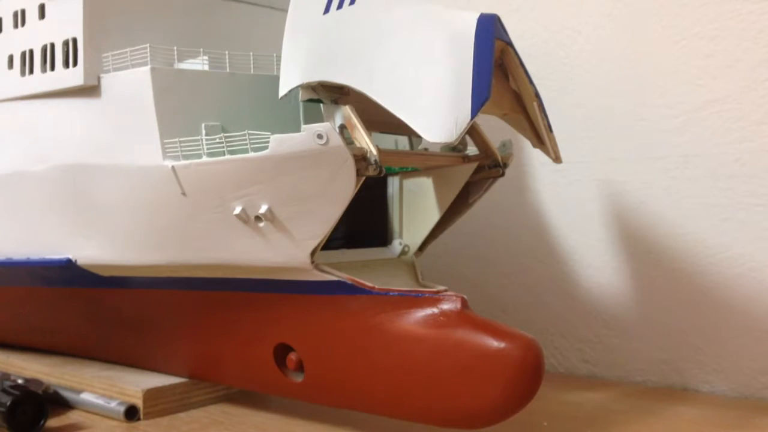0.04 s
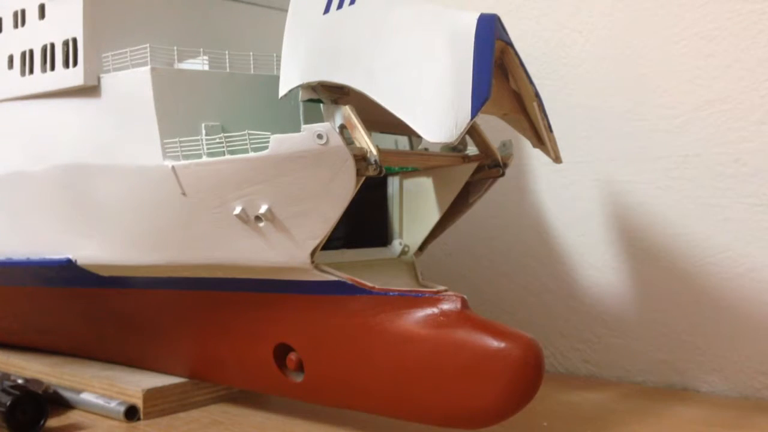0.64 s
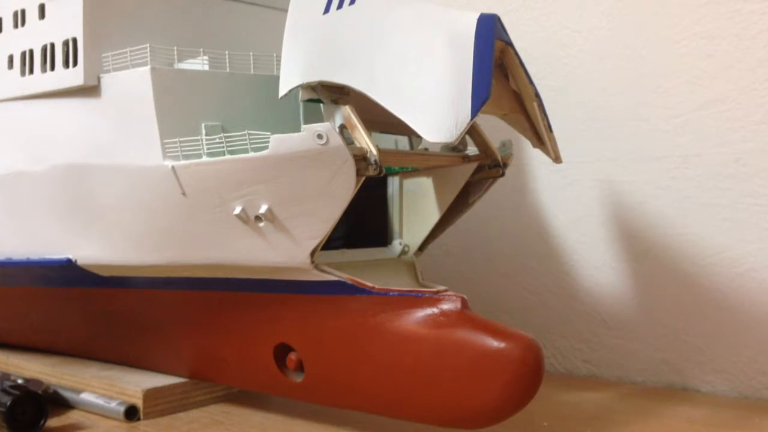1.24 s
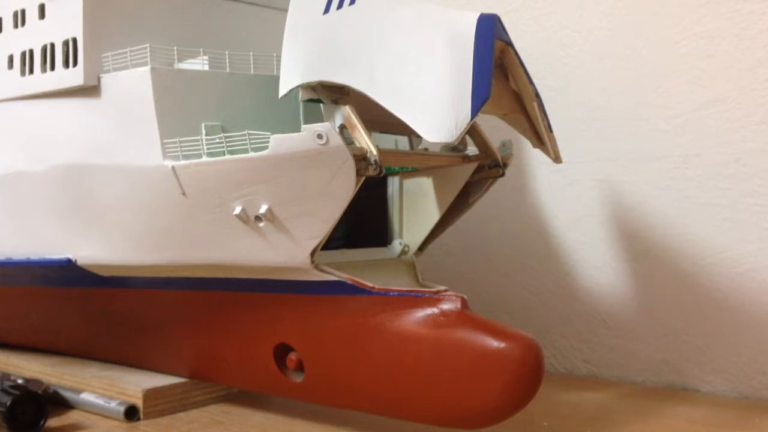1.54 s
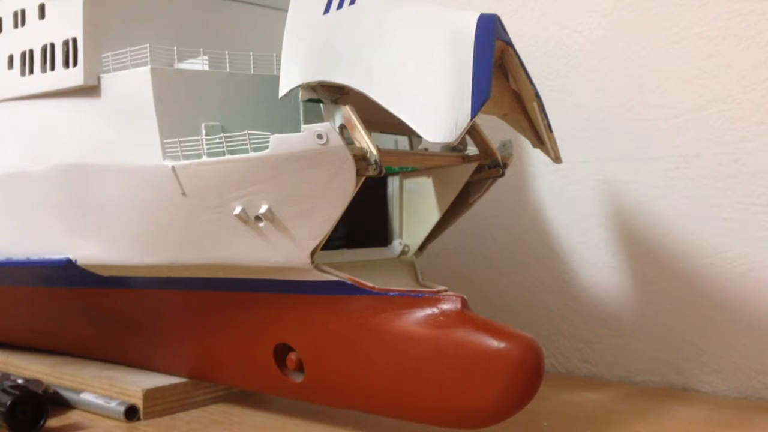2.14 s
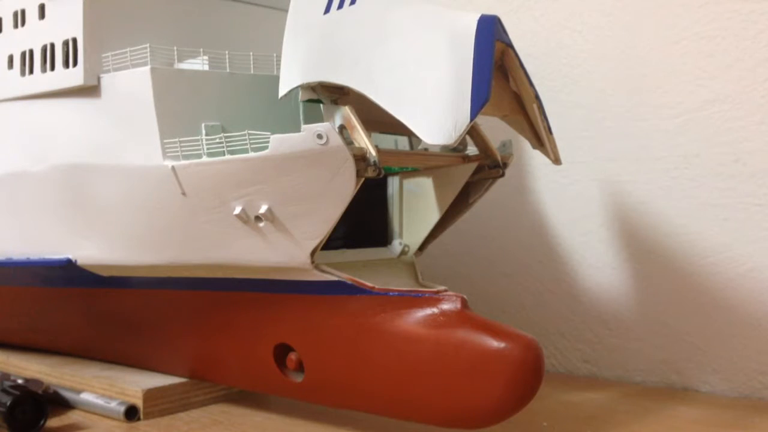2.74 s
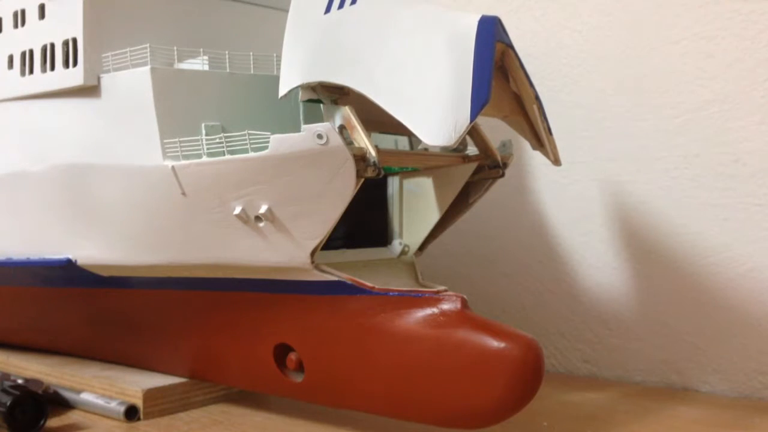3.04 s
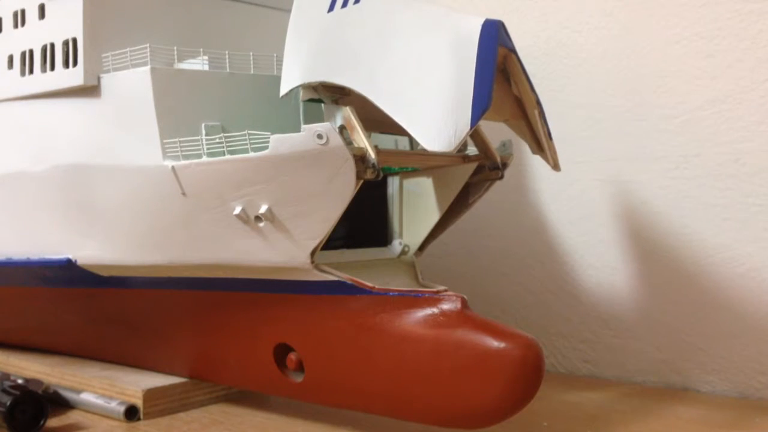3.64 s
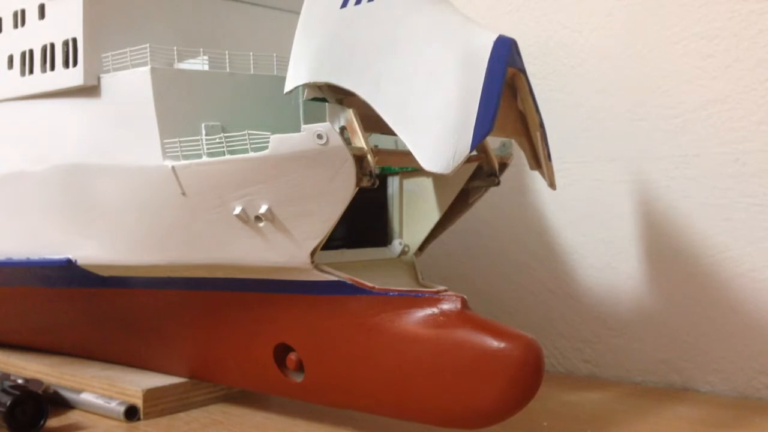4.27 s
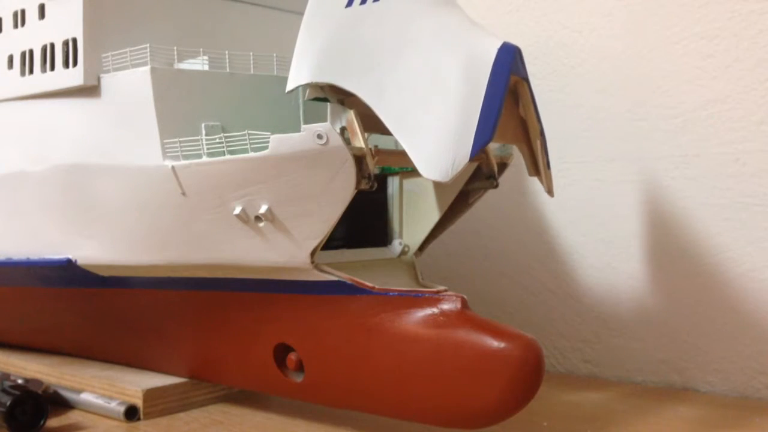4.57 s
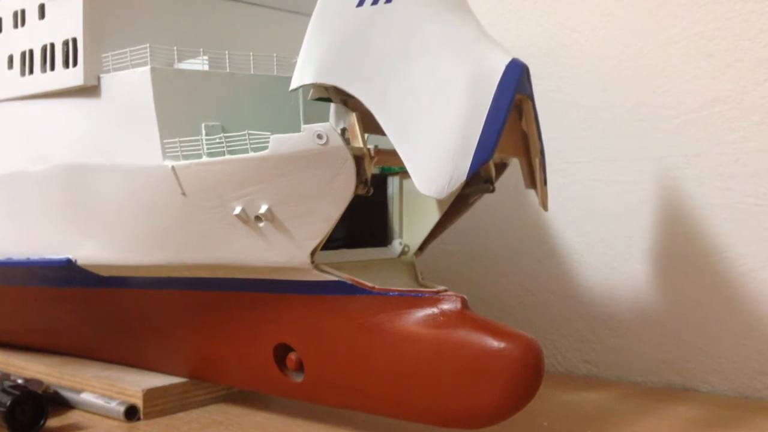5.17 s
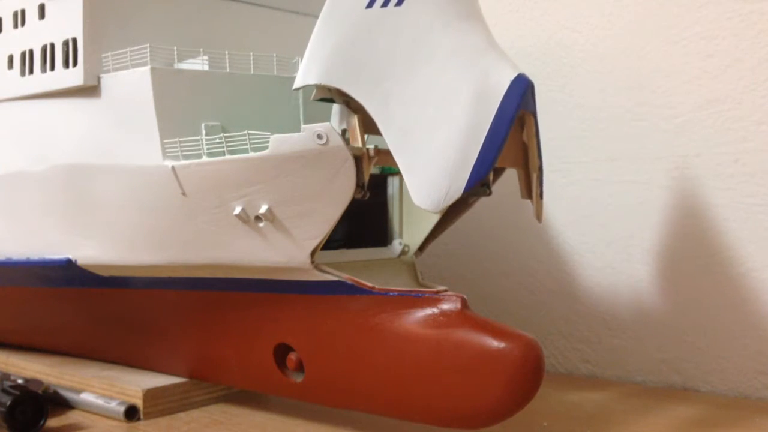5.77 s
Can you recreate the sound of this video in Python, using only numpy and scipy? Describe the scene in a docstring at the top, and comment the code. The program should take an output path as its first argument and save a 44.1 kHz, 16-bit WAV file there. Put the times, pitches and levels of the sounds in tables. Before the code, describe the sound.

For almost two seconds there is only the soft air of a quiet room, with a few faint, dull ticks in the first second. At about 1.9 seconds a small geared electric motor starts with a short clatter and spins up almost at once. It runs with a mid-pitched hum, a higher gear whine, a fast rattling chatter and a thin hiss. Between 2.4 and 3.4 seconds the linkage rubs and scrapes faintly. From about 3.2 seconds, as the motor lowers a model ship's bow visor, the hum becomes clearly stronger, a gear tone throbs, and the pitch sags slightly before partly recovering. The gears ring in short bouts, most strongly just after 4 seconds, and tiny squeals come and go, with one brief brighter squeak near 5.5 seconds. The hum stutters slightly under load, and the motor is still running at the end, near 5.8 seconds.

```python
"""A small geared DC motor lowers the hinged bow visor of a model ship, in a quiet room.
A few faint ticks sound over the still air. Near 1.9 s the current comes on: the gears jolt and
rattle as the motor spins up. Its three-pole rotor hums through the hull, the gears whine and
knock once a turn, and the brush hiss builds. From about 3 s the visor moves and a lower gear tone
throbs. The linkage rubs now and then, and the motor slows a little whenever the linkage loads it."""
import sys
import numpy as np
from scipy.fft import rfft, irfft, next_fast_len
from scipy.io import wavfile
from scipy.ndimage import map_coordinates

SR = 44100
rng = np.random.default_rng(int(sys.argv[2]) if len(sys.argv) > 2 else 0)


def digitize_waveform(pressure):
    """Quantize a signal to 16-bit integers and store it at the path in sys.argv[1].

    Rows of a 2-D input are taken as channels; values are limited to [-1, 1].
    """
    field = np.atleast_2d(pressure).T
    bounded = np.clip(field, -1, 1)
    quanta = np.round(bounded * 32767).astype(np.int16)
    wavfile.write(sys.argv[1], SR, quanta)


N = 256220
TIME = np.arange(N) / SR
SWITCH_ON_S, SPIN_UP_S = 1.877, 0.205  # the current is fully on; time to reach running speed


def amp(db):
    """Decibels to gain."""
    return 10 ** (np.asarray(db) / 20)


def unit(x):
    """Scale to rms 1."""
    return x / np.sqrt(np.mean(x ** 2) + 1e-20)


def along(points, hz):
    """Read (Hz, value) points on a log frequency axis."""
    freqs, values = np.transpose(points)
    return np.interp(np.log(hz + 1), np.log(freqs), values)


def curve(points):
    """An automation line through (seconds, value) points."""
    return np.interp(TIME, *np.transpose(points))


def wobble(rate):
    """A smooth random curve with rate knots a second."""
    coarse = np.arange(0, N + 64, 64)
    knots = rng.standard_normal(1024)
    return np.interp(np.arange(N), coarse, map_coordinates(knots, [coarse * rate / SR], mode="wrap"))


def held(start, end, attack, release):
    """An envelope that reaches 1 at start, holds until end, then falls; all in seconds."""
    return np.interp(TIME, [start - attack, start, end, end + release], [0, 1, 1, 0])


def spells(rows, attack, release):
    """The summed gain of held (start, end, dB) events."""
    return sum(amp(db) * held(start, end, attack, release) for start, end, db, *_ in rows)


def since_start(seconds):
    """Rises from 0 at switch-on to 1 after so many seconds."""
    return np.clip((TIME - SWITCH_ON_S) / seconds, 0, 1)


def settling(seconds):
    """Falls from 1 at switch-on to 0 after so many seconds, slowly at first."""
    return 1 - since_start(seconds) ** 2


def filtered(x, response):
    """Shape x by a gain that depends on frequency."""
    size = next_fast_len(N + SR // 4)
    return irfft(rfft(x, size) * response(np.fft.rfftfreq(size, 1 / SR)), size)[:N]


def peak(hz, centre, width):
    """A resonance curve: 1 at the centre, one half at half a width to either side."""
    return 1 / (1 + (2 * (hz - centre) / width) ** 2)


def noise(spectrum, gate=1):
    """Gated noise of rms 1, coloured by (Hz, dB) points."""
    return unit(filtered(gate * rng.standard_normal(N), lambda hz: amp(along(spectrum, hz))))


def tone(phase):
    """A sine of rms 1."""
    return np.sqrt(2) * np.sin(phase)


def once_a_turn(angle, sharp):
    """A swell at the same shaft angle on every turn."""
    return np.exp(sharp * (np.cos(angle) - 1))


def room_air():
    """The still air of the room: a soft, broad bed of noise."""
    # The colour of the air. Each row: frequency in Hz, relative level in dB.
    colour = [(15, -36), (25, -12), (60, -2), (125, -1), (146, -12), (180, -2.5), (415, -3), (450, -4),
              (488, -2.5), (927, -6.5), (1420, -8), (2850, -7), (10900, -8.5), (15000, -9.5)]
    return amp(-68 + 0.4 * wobble(12)) * noise(colour)


def ticks(t60_s=0.21):
    """Soft, dull ticks that die away quickly in the room."""
    # Ticks before the motor runs. Each row: start in seconds, level in dB.
    hits = [(.047, -70.5), (.171, -67.5), (.304, -69), (.379, -70), (0.774, -68)]
    level = sum(amp(db - 60 * np.abs(TIME - start) / t60_s) * (TIME > start) for start, db in hits)
    return level * noise([(150, -23), (450, 1.5), (1600, -0.5), (2400, -4.5), (3500, -22)])


def linkage(idle_db=-84):
    """The arms rumble against the hull and scrape now and then as they push the visor."""
    # Low rubs on the hull. Each row: start and end in seconds, level in dB.
    rubs = [(2.37, 2.41, -68), (2.77, 2.83, -66), (2.87, 2.92, -64), (4.21, 4.24, -72), (5.54, 5.57, -74)]
    # Bright scrapes. Each row: start and end in seconds, centre and width in Hz, level in dB.
    scrapes = [(2.46, 2.56, 2580, 450, -62.5), (2.61, 2.68, 2330, 400, -61), (2.42, 3.36, 7700, 1700, -69),
               (3.8, 3.3, 3836, 364, -67)]
    level = amp(idle_db) + spells(rubs, attack=0.027, release=0.027)
    total = level * noise([(40, -36), (90, -16), (135, -7), (200, -19), (320, -10), (600, -58)])
    for start, end, centre, width, db in scrapes:
        stroke = held(start, end, attack=0.02, release=0.0084)
        rasp = filtered(rng.standard_normal(N), lambda hz: peak(hz, centre, width))
        total += amp(db) * stroke * unit(rasp)
    return total


def brushes(angle, speed, hiss_db=-58, cold_db=-9, buzz_share=0.27):
    """The brushes hiss and ring the motor can; commutator scratches come round as a fine buzz."""
    # The colour of the brush friction. Each row: frequency in Hz, relative level in dB.
    colour = [(250, -12), (450, 3.5), (900, 3.5), (2200, 0.5), (2800, 0.5), (4000, -0.5), (4800, -3),
              (6200, -2.5), (7100, -2.5), (7700, -6.5), (8700, -2.5), (9500, -8.5), (11300, -5.5),
              (12400, -6.5), (15200, -12)]
    # Resonances of the can and brush springs. Each row: centre and width in Hz, strength in dB.
    modes = [(2900, 28, -8.5), (4170, 32, 5.5), (6920, 200, 4.5), (8700, 110, 7), (11100, 170, -4),
             (13700, 120, -6)]
    friction = noise(colour, once_a_turn(angle, sharp=0.054))
    can_power = lambda hz: sum(amp(db) ** 2 * peak(hz, centre, width) for centre, width, db in modes)
    ringing = unit(filtered(friction, lambda hz: np.sqrt(1 + can_power(hz))))
    bedded = held(3.2, N / SR, attack=0.6, release=1)  # the can rings fully once the brushes bed in
    hiss = bedded * ringing + (1 - bedded) * friction
    usual_speed, buzz = np.median(speed), np.zeros(N)
    for k in range(25, 100):
        drift_db, phase = 4 * wobble(6), 2.5 * wobble(3)
        buzz += amp(along(colour, k * usual_speed) - 0.05 * k + drift_db) * tone(k * angle + phase)
    level = amp(hiss_db + cold_db * settling(0.62) + 0.62 * wobble(14))
    return level * (np.sqrt(1 - buzz_share) * hiss + np.sqrt(buzz_share) * unit(buzz))


def squeals(angle):
    """Shifting load lets single overtones of the drive sing out for a moment."""
    # The squeals. Each row: start and end in seconds, multiple of the shaft speed, level in dB.
    overtones = [(2.067, 2.378, 7, -62.5), (2.098, 2.37, 16, -63), (2.1, 2.342, 17, -65),
                 (2.08, 2.387, 96, -75), (2.08, 2.35, 48, -76), (2.28, 2.35, 36, -72),
                 (2.287, 2.335, 20, -71), (2.603, 2.676, 19, -59), (2.749, 2.956, 96, -79),
                 (2.882, 3.027, 19, -62), (3.166, 3.42, 16, -60.5), (3.152, 3.36, 96, -72),
                 (3.445, 3.732, 18, -61), (3.74, 3.97, 96, -77), (3.4, 4.149, 7, -72),
                 (3.764, 4.117, 19, -63.5), (4.083, 4.225, 28, -65), (4.363, 4.6, 112, -75),
                 (4.461, 4.92, 9, -69), (4.45, 4.92, 8, -71), (4.94, 5.139, 112, -76),
                 (5.105, 5.2, 19, -64), (5.22, 5.297, 18, -60), (5.268, 5.52, 112, -78),
                 (5.533, 5.571, 14, -48.5), (5.55, 5.8, 96, -79)]
    total = np.zeros(N)
    for start, end, multiple, db in overtones:
        level = amp(db + 2.5 * wobble(40)) * held(start, end, attack=0.0089, release=0.01)
        total += level * tone(multiple * (angle + 0.011 * wobble(79)))
    return total


def jolt(db=-51, t60_s=0.17):
    """One burst of clatter as the current comes on and throws the gears against each other."""
    age = np.maximum(TIME - SWITCH_ON_S, 0)
    clatter = noise([(150, -25), (300, 3), (550, 10), (900, -13), (1400, -8), (2300, -2),
                     (3000, -30), (5000, -60)])
    return amp(db - 60 * age / t60_s) * clatter


def gear_whine(angle, load, rough, pinion_trim_db=-2.5, wheel_db=-65, throb_from_s=3.15):
    """Pinion and wheel sing at their tooth rates; a lower gear tone beats with the fifth overtone."""
    # The pinion's whine. Each row: time in seconds, level in dB before the trim.
    pinion_levels = [(2.06, -50.5), (2.36, -61), (2.85, -54.5), (4.05, -54.5), (4.14, -62), (4.36, -53),
                     (5.4, -63.5), (5.47, -58), (5.53, -65), (5.81, -60)]
    # The wheel sings louder. Each row: start and end in seconds, level of the added swell in dB.
    wheel_swells = [(2.15, 2.33, -68), (2.6, 2.8, -70), (3.13, 3.36, -61.5), (3.92, 4.05, -61),
                    (4.92, 5.2, -57)]
    spin_up_db = -9 * settling(SPIN_UP_S)  # the pinion is weaker until it is up to speed
    pinion_level = amp(curve(pinion_levels) + pinion_trim_db + spin_up_db + 0.94 * wobble(24.87))
    pinion = pinion_level * tone(10 * angle + rough * wobble(60))  # loose teeth blur the tone
    choke_db = 8.5 * np.maximum(load - 7.3, 0)  # a heavy load chokes the wheel
    wheel_level = amp(wheel_db - choke_db) + spells(wheel_swells, attack=0.06, release=0.046)
    wheel = wheel_level * amp(1.1 * wobble(28)) * tone(12 * angle + rough * wobble(60))
    moving = held(throb_from_s, N / SR, attack=0.1, release=1)  # the visor starts to move
    throb_level = moving * amp(-58.5 - 1.75 * (TIME - throb_from_s))
    throb = tone(5 * angle) + 0.52 * tone(5.11 * angle + 0.63 * wobble(5.8))
    return pinion + wheel + throb_level * throb


def gear_knocks(angle, speed, rough, ring_idle_db=-64, chatter_db=-69.5, clatter_db=-51.5):
    """One knock a turn rings the gearbox, whose pitch shifts with the load; loose teeth clatter."""
    # The colour of the knock's overtones. Each row: frequency in Hz, relative level in dB.
    knock_colour = [(450, -9), (780, 2.5), (900, -7.5), (1020, -2), (1230, -9.5), (1700, -3.5), (1900, 0),
                    (2200, -1.5), (2450, -3.5), (2700, -14.5)]
    # The colour of the tooth clatter. Each row: frequency in Hz, relative level in dB.
    clatter_colour = [(88, -81), (150, -26), (263, -10), (298, -6), (450, -12.5), (561, -4.5), (626, -8.5),
                      (689, 2.5), (759, -15), (1130, -15.5), (1310, -4.5), (1680, -5), (2150, -8.5),
                      (2900, -29), (4000, -60), (5200, -87), (8800, -120)]
    # Bouts of ringing. Each row: start and end in seconds, level in dB before the blend, centre in Hz.
    bouts = [(1.937, 1.99, -48.5, 1330), (2.082, 2.143, -48.5, 1514), (2.334, 2.382, -59.5, 1540),
             (2.51, 2.535, -62, 1530), (2.956, 3.056, -53.5, 1520), (3.16, 3.238, -51.5, 1531),
             (3.395, 3.441, -49, 1560), (3.52, 3.616, -58, 1460), (3.785, 3.876, -50, 1537),
             (3.947, 4.004, -51, 1505), (4.038, 4.23, -45, 1516), (4.34, 4.48, -53.5, 1509),
             (4.627, 4.883, -59.5, 1623), (5.15, 5.519, -49.5, 1524), (5.59, 5.813, -53.5, 1534)]
    ring_level = amp(ring_idle_db) + spells(bouts, attack=0.066, release=0.023)
    ring_hz = curve([(s, hz) for start, end, _, hz in bouts for s in (start, end)])
    slack_db = 5 * settling(0.39)  # extra knocking until the slack in the gears is taken up
    knock_angle = angle + 0.009 * wobble(45)  # each knock falls a little early or late
    chatter, ring, ring_power = np.zeros((3, N))
    for k in range(4, 24):
        smear = 2.4 * wobble(1.5)  # the hollow hull smears the knock in time
        partial = tone(k * knock_angle + smear + rough * wobble(45))
        chatter += amp(along(knock_colour, k * speed) + 4.06 * wobble(9)) * partial
        resonance = 1 / (1 + ((k * speed - ring_hz) / 110) ** 4)  # flat top, steep sides
        ring += resonance * amp(1.5 * wobble(7)) * partial
        ring_power += resonance ** 2
    knocks = ring_level * ring / np.sqrt(ring_power) + amp(chatter_db + slack_db) * chatter
    clatter = amp(clatter_db + slack_db) * noise(clatter_colour, once_a_turn(angle, sharp=0.2))
    blend = np.sqrt(1 - rough) * knocks + np.sqrt(rough) * clatter
    return amp(1.2 * wobble(45)) * blend


def rotor(angle, stutter_s=0.0073):
    """Three poles pull three times a turn and hum through the hull; the commutator switches six times."""
    # The hum carried by the hull. Each row: time in seconds, level in dB.
    hum_levels = [(1.93, -91), (1.97, -50), (2.06, -57), (2.13, -59), (2.32, -60), (2.7, -60.5),
                  (3.0, -57.5), (3.218, -49), (3.235, -41), (3.39, -40), (3.48, -45), (3.9, -44),
                  (4.2, -42), (4.75, -40.5), (5.52, -42.5), (5.62, -50)]
    # Brief swells added to the hum. Each row: start and end in seconds, level in dB.
    swells = [(2.025, 2.055, -48.5), (2.09, 2.1, -51.5), (2.36, 2.41, -60), (2.76, 2.88, -65),
              (3.06, 3.08, -48), (5.78, 5.82, -46.5)]
    # The hum stutters under load. Each row: time in seconds, dip in dB.
    stutters = [(4.29, -2.5), (4.35, -3.5), (4.42, -3), (4.478, -9), (4.575, -2.5), (5.162, -8),
                (5.265, -8.5), (5.39, -6.5), (5.47, -7)]
    # The commutator's tone. Each row: time in seconds, level in dB.
    commutator_levels = [(1.9, -68), (1.93, -45), (1.98, -71), (2.05, -52.5), (2.34, -52.5), (2.5, -75),
                         (2.6, -55.5), (2.97, -52), (3.25, -55.5), (3.4, -49.5), (4.0, -48), (4.33, -55),
                         (4.73, -49.5), (5.2, -53.5), (5.81, -55.5)]
    hum_db = curve(hum_levels)
    stutter_db = sum(db * np.exp(-((TIME - s) / stutter_s) ** 2) for s, db in stutters)
    # A lightly coupled hull hums unsteadily, a firmly coupled one evenly.
    flutter = np.clip((-41.5 - hum_db) * 0.11, 0.25, 2.5)
    hum_level = amp(hum_db + stutter_db + flutter * wobble(45))
    hum_level += spells(swells, attack=0.014, release=0.0068)
    hum = hum_level * tone(3 * angle + 0.052 * flutter * wobble(55))
    commutator_level = amp(curve(commutator_levels) + 0.23 * wobble(30))
    return hum + commutator_level * tone(6 * angle + 0.054 * wobble(37))


def scene():
    """The motor is switched on in the quiet room, spins up, and slows under the visor's load."""
    # The shaft once spun up. Each row: time in seconds, speed in turns per second.
    running_speeds = [(2.06, 116), (2.25, 116.3), (2.53, 114.6), (2.66, 116.2), (2.81, 115.2), (2.9, 116.6),
                      (3.0, 116.4), (3.29, 113.3), (3.49, 108.6), (3.7, 109.4), (3.79, 109.8),
                      (3.94, 110.6), (4.21, 110.3), (4.29, 113.2), (4.42, 113.9), (4.87, 111.5),
                      (4.91, 112.6), (5.18, 113.9), (5.5, 113.5), (5.57, 115.0), (5.73, 115.1),
                      (5.81, 114.5)]
    start_speed, free_speed = 82, 117.7  # turns per second: at switch-on, with no load
    running = curve(running_speeds)
    speed = start_speed + (running - start_speed) * since_start(SPIN_UP_S)
    angle = 2 * np.pi * np.cumsum(speed) / SR
    load = np.maximum(free_speed - running, 0)  # turns per second lost
    # The gears run rougher while spinning up and under load.
    rough = np.clip(0.048 + 0.51 * settling(0.26) + 0.021 * load, 0, 0.95)
    power = held(SWITCH_ON_S, N / SR, attack=0.023, release=1) ** 2
    gears = gear_whine(angle, load, rough) + gear_knocks(angle, speed, rough) + squeals(angle) + jolt()
    air = room_air()
    drive = rotor(angle) + gears + brushes(angle, speed) + linkage()
    return air + ticks() + power * drive


def record(dry, top_hz=15300):
    """A sheer low-pass takes off the highest treble."""
    return filtered(dry, lambda hz: hz < top_hz)


dry = scene()
out = record(dry)
digitize_waveform(out)
```